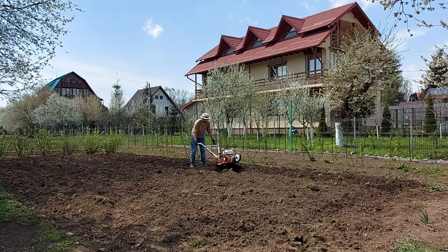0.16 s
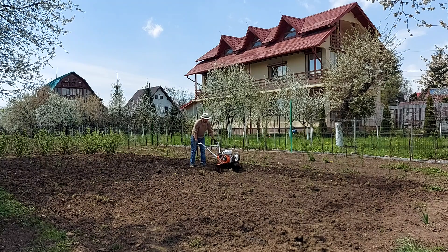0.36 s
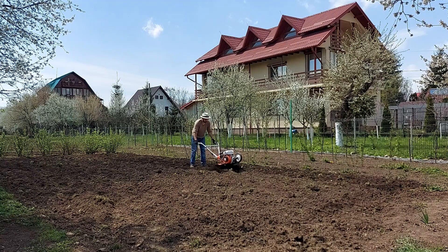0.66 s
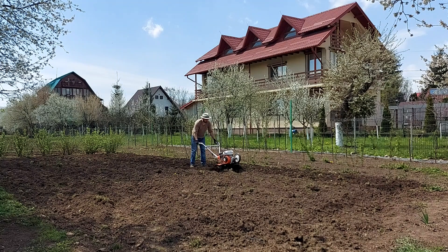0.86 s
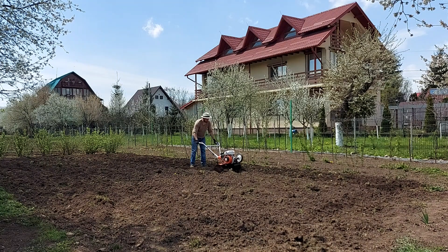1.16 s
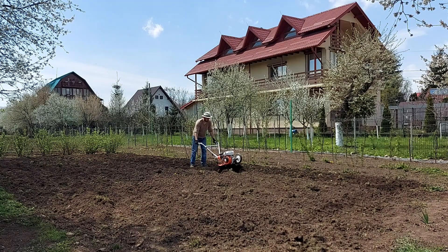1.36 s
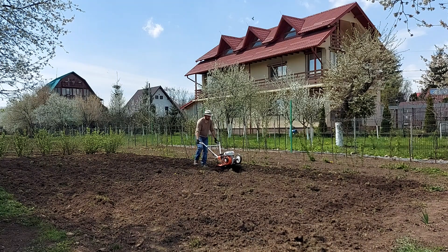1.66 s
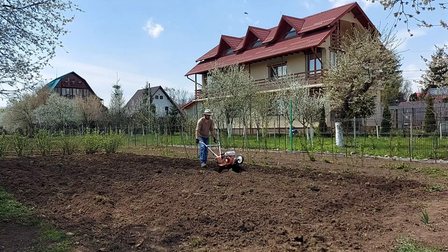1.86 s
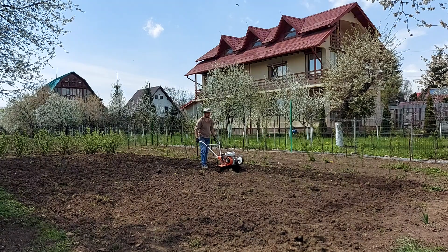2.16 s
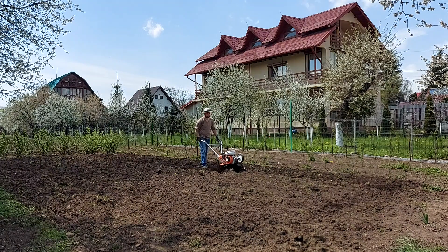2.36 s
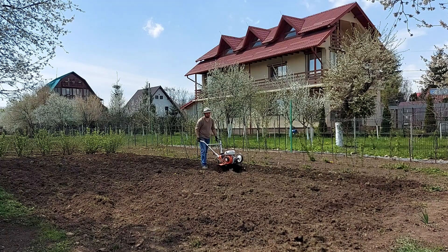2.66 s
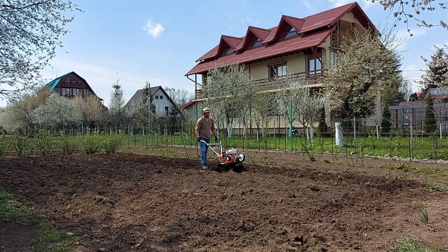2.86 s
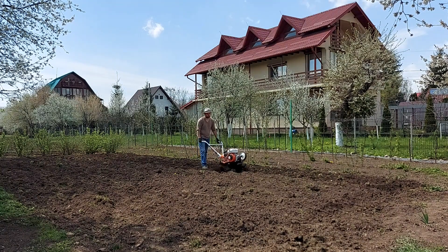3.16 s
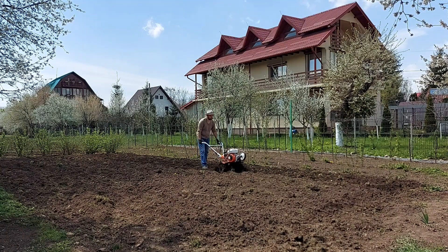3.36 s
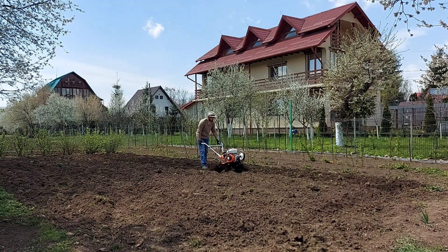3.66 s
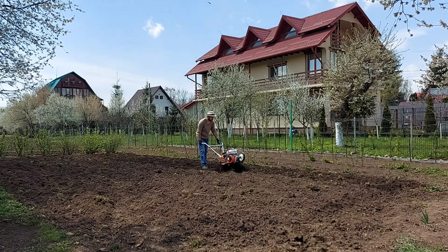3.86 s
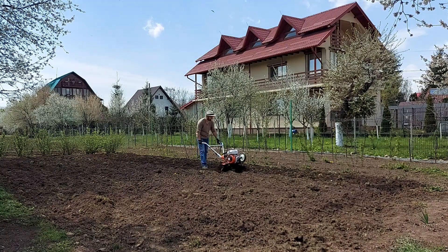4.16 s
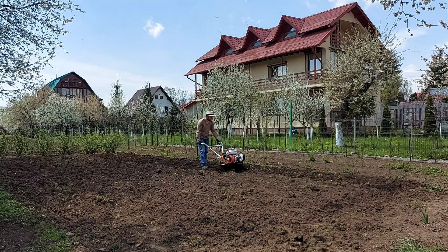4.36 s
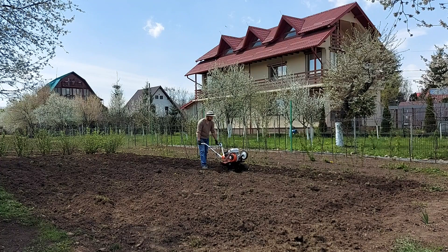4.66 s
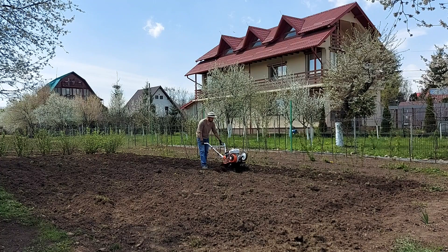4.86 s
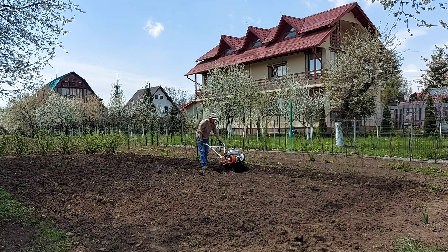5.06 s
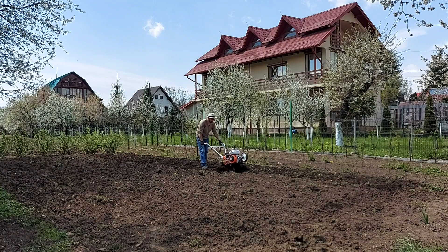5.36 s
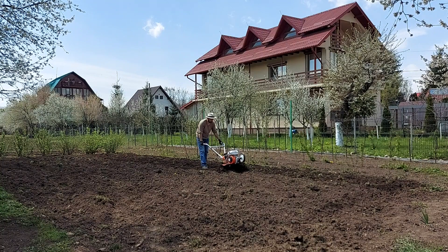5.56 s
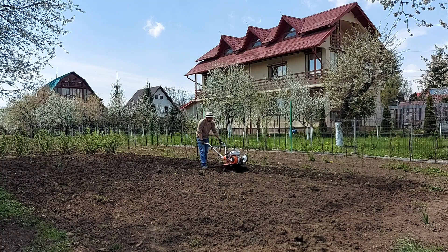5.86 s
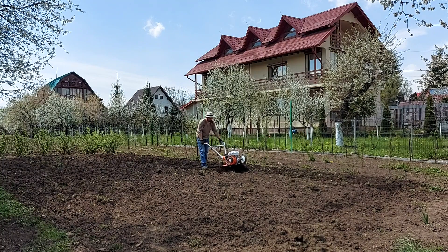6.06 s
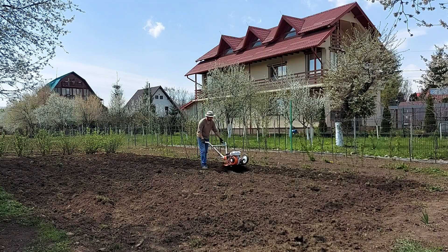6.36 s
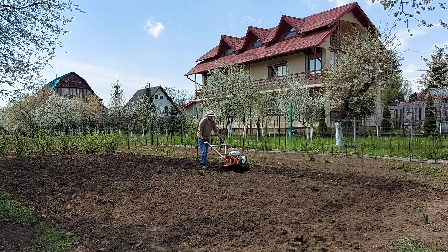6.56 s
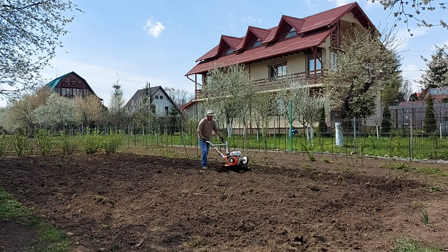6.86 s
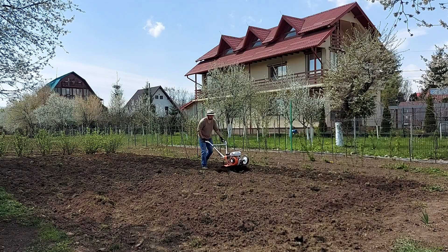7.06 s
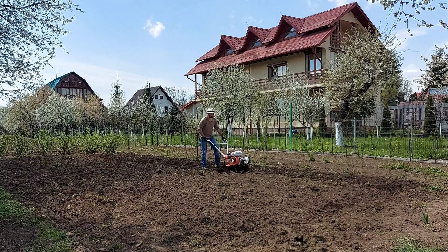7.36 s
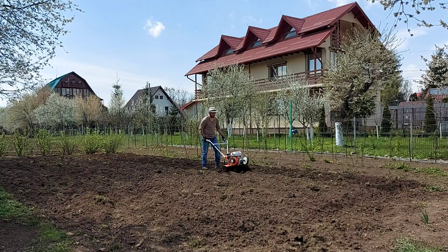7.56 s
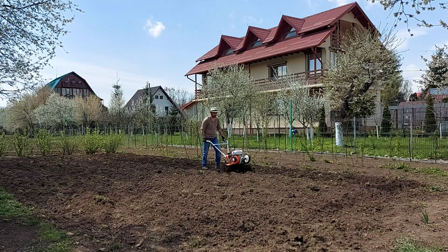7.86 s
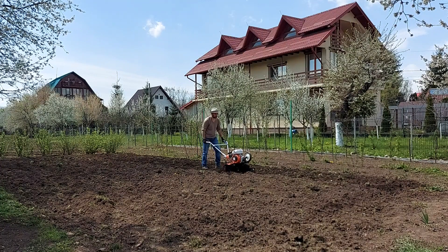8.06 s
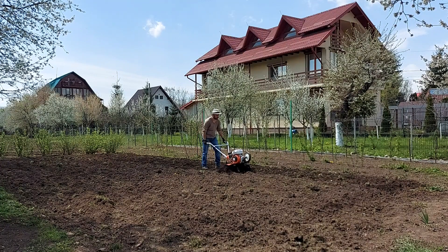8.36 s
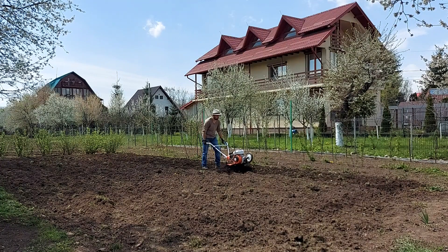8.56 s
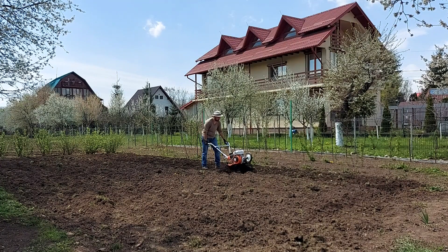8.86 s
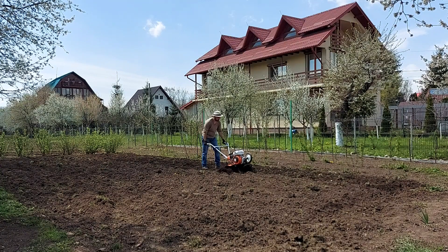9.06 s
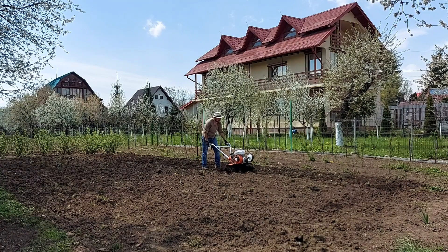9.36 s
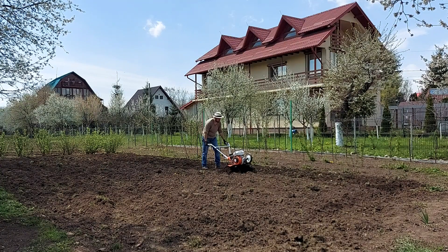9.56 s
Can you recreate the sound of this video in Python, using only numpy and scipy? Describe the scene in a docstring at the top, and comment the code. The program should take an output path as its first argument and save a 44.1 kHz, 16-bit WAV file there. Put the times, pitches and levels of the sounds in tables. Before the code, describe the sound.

Outdoors, a small single-cylinder tiller engine chugs under load, rattling metallically while dry earth rustles, the drive chirps and a light breeze rumbles.

```python
"""A petrol rotary tiller putters across a dry garden plot, some metres from the microphone.
Its single-cylinder four-stroke gulps, barks, knocks and clatters once a cycle, each stroke set off by one crank;
in bouts the governor hunts about three times a second. A nearby wall echoes the beat and the pipe drones.
Shaped noise makes the rustling, scraping soil and the light breeze on the microphone.
Short rising chirps make the squeaks of the drive."""
import sys
import numpy as np
from scipy import signal
from scipy.fft import rfft, irfft, next_fast_len
from scipy.io import wavfile
from scipy.ndimage import uniform_filter1d, map_coordinates

SR = 44100
rng = np.random.default_rng(int(sys.argv[2]) if len(sys.argv) > 2 else 0)


def unload_wav(signal):
    """Save mono or channel-first audio to the path in sys.argv[1] as 16-bit WAV at rate SR, clipped to [-1, 1]."""
    wavfile.write(
        sys.argv[1],
        SR,
        np.round(np.clip(np.atleast_2d(signal).T, -1, 1) * 32767).astype(np.int16),
    )


N = 428652


def amp(db):
    """Decibels to gain."""
    return 10 ** (np.asarray(db) / 20)


def unit(x):
    """x at rms 1."""
    return x / np.sqrt(np.mean(x ** 2) + 1e-20)


def seconds(count):
    """Time in s of each of count samples."""
    return np.arange(count) / SR


def curves(rows):
    """One value per sample for each column after the time."""
    s, *columns = np.transpose(rows)
    return [np.interp(seconds(N), s, column) for column in columns]


def wobble(rate):
    """A smooth random curve, rate knots a second."""
    knots = rng.standard_normal(int(N * rate / SR) + 4)
    return map_coordinates(knots, [np.arange(N) * rate / SR])


def bump(s, length):
    """A smooth swell of height 1 around time s."""
    return np.exp(-(2 * (seconds(N) - s) / length) ** 2)


def surge(t, rise):
    """A quick push that peaks at height 1 after rise seconds, then dies away."""
    return t / rise * np.exp(1 - t / rise)


def gain_along(points, hz):
    """Gain of (Hz, dB) points, read on a log frequency axis."""
    f, db = np.transpose(points)
    return amp(np.interp(np.log(hz + 1), np.log(f), db))


def filtered(x, response):
    """x with its spectrum multiplied by a response of frequency."""
    size = next_fast_len(N + SR // 2)
    return irfft(rfft(x, size) * response(np.fft.rfftfreq(size, 1 / SR)), size)[:N]


def coloured(x, spectrum):
    """x shaped by a spectrum, at rms 1."""
    return unit(filtered(x, lambda hz: gain_along(spectrum, hz)))


def add(track, s, sound):
    """Mix a short sound into the track at time s."""
    part = track[max(round(s * SR), 0):][:len(sound)]
    part += sound[:len(part)]


def strokes(cycle, place, scatter_db, jitter):
    """One impulse each time the engine passes a place in its cycle, uneven in size and time (jitter in s)."""
    chance = np.clip(rng.standard_normal((300, 2)), -2, 2)
    passes = np.arange(len(chance)) + place
    at = np.interp(passes, cycle, np.arange(N), right=2 * N) + jitter * SR * chance[:, 0]
    keep = (at >= 0) & (at < N)
    return np.bincount(at[keep].astype(int), amp(scatter_db * chance[keep, 1]), N)


def ring(blows, response):
    """Every impulse sets off the response."""
    return signal.fftconvolve(blows, response)[:N]


# the speed that the governor holds: start_s [s], speed [firings per second]
HELD_SPEED = [(0, 27.0), (.81, 26.63), (.94, 27.01), (1.27, 26.4), (1.75, 27.12), (1.93, 26.44),
              (3.05, 26.9), (3.45, 27.24), (4.53, 26.91), (4.75, 26.56), (5.16, 27.02), (6.6, 26.64),
              (8.35, 27.08), (9.72, 26.89)]
# bouts of hunting that swell and fade:
# top_surge_s [s], swing [firings per second], length_s [s], rate [surges per second]
HUNTING_BOUTS = [(2.82, .96, 1.22, 3.13), (4.83, 1.01, 1.03, 3.05), (5.72, .28, 1.37, 3.09),
                 (6.8, .37, 4.56, 3.52), (7.97, .59, 1.0, 2.89), (9.43, .43, .54, 2.62)]


def governor():
    """Firings per second: the held speed, overshot in both directions during each bout of hunting."""
    speed, = curves(HELD_SPEED)
    for s, swing, length, rate in HUNTING_BOUTS:
        speed = speed + swing * bump(s, length) * np.cos(2 * np.pi * rate * (seconds(N) - s))
    return speed


# air pushes of one cycle, in order: casing rocks, intake gulps, exhaust valve cracks open, exhaust blows
# place [cycle, 0-1], pitch_hz [Hz], rise_s [s], level_db [dB before direction and muffler],
# direction [scale; above 0 blows, below 0 sucks]
AIR_PUSHES = [(.057, 46, 0.0076, -28, 1), (0.1845, 125.7, 0.0017, -18, -0.62),
              (0.435, 546, 0.00085, -28.5, 0.72), (0.472, 176.5, 0.0026, -18, 0.83)]
# the muffler's colour: pitch_hz [Hz], gain_db [dB]
MUFFLER_COLOUR = [(27, -17), (50, 3), (80, 6.5), (110, 0.5), (135, 5.5), (160, 4.5), (190, 2.5),
                  (240, -1.5), (268, -3), (295, 1), (350, -0.5), (380, 5.5), (430, -3.5), (560, 4),
                  (650, 11), (800, -6.5)]


def beat(cycle, echo_s=0.01475, echo_db=-8.5):
    """Casing, intake and exhaust push the air in damped pulses, coloured by the muffler and echoed by a wall."""
    t, out = seconds(SR // 10), np.zeros(N)
    for place, hz, rise, db, direction in AIR_PUSHES:
        pulse = surge(t, rise) ** 2 * np.sin(2 * np.pi * hz * t)
        firings = strokes(cycle, place, scatter_db=.25, jitter=.00002)
        out += direction * amp(db) * ring(firings, pulse)

    def muffler_and_wall(hz):
        """Muffler gain, times the direct sound plus one delayed echo."""
        wall = 1 + amp(echo_db) * np.exp(-2j * np.pi * hz * echo_s)
        return gain_along(MUFFLER_COLOUR, hz) * wall

    return filtered(out, muffler_and_wall)


def drone(putter, speed, pipe_hz=268, width_hz=13, level_db=-35.5, tuned_speed=26.43, reach=0.88,
          lag_s=.05, pull_db=0.0749):
    """The pipe rings on near its resonance, swells as the engine pulls and fades when it races past."""
    late_speed = np.interp(np.arange(N) - lag_s * SR, np.arange(N), speed)
    racing = np.maximum(late_speed - tuned_speed, 0)  # firings per second above the tuned speed
    ringing = unit(filtered(putter, lambda hz: np.exp(-.5 * ((hz - pipe_hz) / width_hz) ** 2)))
    pull = np.gradient(speed) * SR  # firings per second gained each second
    return amp(level_db + pull_db * pull) / (1 + (racing / reach) ** 2) * ringing


# blows on the engine block: place [cycle, 0-1], level_db [dB before the modes and load]
BLOCK_BLOWS = [(0.96, -26.5), (.44, -28)]
# ringing modes of the block: pitch_hz [Hz], level_db [dB], t60_s [s]
BLOCK_MODES = [(980, -3, 0.075), (1045, -5.5, 0.07), (1201, -2.5, 0.041), (1353, -16, 0.044),
               (1560, -15, 0.044), (1798, -9, 0.1)]
# the frame jolts and a guard clanks: start_s [s], level_db [dB before clank_db, the modes and load]
GUARD_CLANKS = [(0.543, -13), (1.118, -19), (3.444, -16), (4.732, -15.5), (4.769, -18), (5.787, -17),
                (6.107, -15), (6.592, -14), (7.584, -21)]


def knock(cycle, clank_db=-5):
    """Combustion and piston slap ring the block, each mode uneven in strength; jolts clank the same metal."""
    t, out, jolts = seconds(SR // 10), np.zeros(N), np.zeros(N)
    for s, db in GUARD_CLANKS:
        add(jolts, s, np.array([amp(db + clank_db)]))
    for hz, mode_db, t60 in BLOCK_MODES:
        blows = jolts.copy()
        for place, db in BLOCK_BLOWS:
            blows += amp(db) * strokes(cycle, place, scatter_db=2.5, jitter=.00008)
        onset = 1 - np.exp(-t / 0.00064)
        out += ring(blows, amp(mode_db - 60 * t / t60) * np.sin(2 * np.pi * hz * t) * onset)
    return out


# relative spectrum of the valve gear: pitch_hz [Hz], level_db [dB per Hz]
CLATTER_SPECTRUM = [(1500, -13), (2900, -9.5), (3500, 0.5), (4000, 1), (4150, 3.5), (4350, 0), (4800, -2.5),
                    (6300, -3.5), (6900, -8), (7600, -15.5), (8800, -5.5), (9900, -7.5), (11100, -10.5),
                    (11900, -19.5), (13700, -17), (15800, -24)]
# valve gear and piston impacts: place [cycle, 0-1], level_db [dB over the steady hiss], t60_s [s]
VALVE_TAPS = [(.105, 4, 0.042), (0.238, 5, 0.074), (.41, -1, 0.026), (.85, -2, .02)]


def clatter(cycle):
    """Each impact of the valve gear is a short burst of bright noise on a steady hiss."""
    t, power = seconds(SR // 10), np.ones(N)
    for place, db, t60 in VALVE_TAPS:
        impacts = strokes(cycle, place, scatter_db=2.5, jitter=0.0001)
        power += ring(impacts ** 2, amp(db - 60 * t / t60) ** 2)
    bursts = rng.standard_normal(N) * np.sqrt(np.abs(power))
    return coloured(bursts * amp(0.97 * wobble(700)), CLATTER_SPECTRUM)


# relative spectrum of fan, gears and cowling: pitch_hz [Hz], level_db [dB per Hz]
CASING_SPECTRUM = [(80, -31), (140, -5.5), (280, -6.5), (430, -17), (620, -6.5), (800, -9), (960, -2.5),
                   (1250, -1.5), (1500, -2), (1850, -4.5), (2200, -7), (2550, -10), (3000, -21.5),
                   (5000, -38)]


def whirr(cycle, depth=0.13, loudest=0.27):
    """Fan, gears and cowling roar as noise, swelling once a cycle."""
    swell = 1 + depth * np.cos(2 * np.pi * (cycle - loudest))
    return coloured(rng.standard_normal(N) * swell * amp(0.78 * wobble(220)), CASING_SPECTRUM)


def rattle(cycle, low_hz=920, high_hz=2050, t60=0.053, loudest=.25, spread=.24, scatter_db=4):
    """Guards and linkages, shaken by the firings, chatter in short ringing strokes at random pitches."""
    t, out = seconds(SR // 25), np.zeros(N)
    chance = rng.standard_normal((2600, 2))
    turns = np.floor(rng.uniform(0, cycle[-1], len(chance))) + loudest + spread * chance[:, 0]
    starts = np.interp(turns, cycle, seconds(N))
    pitches = low_hz * (high_hz / low_hz) ** rng.random(len(chance))
    sizes = np.clip(chance[:, 1], -2, 2)
    fade = amp(-60 * t / t60) * (1 - np.exp(-t / 0.0003))
    for s, hz, size in zip(starts, pitches, sizes):
        add(out, s, amp(scatter_db * size) * fade * np.sin(2 * np.pi * hz * t))
    return unit(out)


# how hard the tines load the engine: start_s [s], load_db [dB]
TINE_LOAD = [(0, -0.1), (.7, 0.05), (1.08, 1.5), (1.45, 0.5), (1.85, -2), (2.5, 0), (3.15, 0.4),
             (3.9, -0.56), (4.8, .5), (5.45, -0.2), (5.9, .3), (6.25, 0.5), (6.48, -1.9), (6.7, 0),
             (7.9, 0.7), (8.2, 0), (9.72, 0.5)]


def tine_load():
    """Load of the ground on the tines in dB, around 0 at normal load."""
    load_db, = curves(TINE_LOAD)
    return load_db


# relative spectrum of dry soil: pitch_hz [Hz], level_db [dB per Hz]
SOIL_SPECTRUM = [(800, -31), (3000, -12), (5500, 12), (6600, 12), (7600, -2.5), (9000, 11.5), (11000, 6.5),
                 (12000, 0.5), (13800, 1.5), (15800, -12)]
# a tine grinds through a gritty clod: start_s [s], level_db [dB before the scrape and spray trims]
CLOD_SCRAPES = [(.1322, -27), (.8345, -36), (0.951, -30), (1.309, -27), (2.17, -31), (2.4798, -25),
                (2.6646, -25), (3.0719, -24), (3.1847, -25), (3.2585, -29.5), (3.3278, -32),
                (3.8117, -25.5), (4.52, -33), (4.6578, -31), (4.74, -30), (5.3344, -27), (5.63, -28.5),
                (6.1538, -26.5), (6.7, -32), (6.842, -29), (7.41, -28), (7.8645, -28), (7.905, -28),
                (7.9494, -27), (8.93, -34)]
SOIL_DB, SOIL_GROWS = -45.5, 2  # level in dB; dB per dB of load


def soil(cycle, load_db, depth=0.13, loudest=0.26, uneven_db=1.9, spray_s=0.025, spray_db=-14):
    """Dry crumbs rustle off the tines, harder once a cycle; gritty clods scrape louder and throw a spray."""
    t, scrapes, spray = seconds(SR // 4), np.zeros(N), np.zeros(N)
    for s, db in CLOD_SCRAPES:
        add(scrapes, s - .002, amp(db - 4.5) * surge(t, 0.0058))
        add(spray, s - spray_s, amp(db + spray_db) * surge(t, spray_s))
    rustle = np.hypot(amp(SOIL_DB + SOIL_GROWS * load_db + uneven_db * wobble(9)), spray)
    push = 1 + depth * np.cos(2 * np.pi * (cycle - loudest))
    crumbs = coloured(rng.standard_normal(N) * amp(3.6 * wobble(1100)), SOIL_SPECTRUM)
    return crumbs * np.hypot(push * rustle * amp(1.3 * wobble(70)), scrapes)


# the drive squeaks: start_s [s], level_db [dB before a 2.2 dB cut], pitch_hz [Hz at the chirp's swell]
DRIVE_SQUEAKS = [(0.0373, -22.5, 10000), (0.5947, -23, 8600), (0.6656, -24, 10000), (1.0331, -23, 9020),
                 (1.1209, -16.5, 8950), (1.387, -17, 9960), (1.921, -24, 9610), (1.9794, -26, 9370),
                 (2.2238, -19, 10500), (2.5466, -19, 8740), (2.5701, -14.5, 10100), (2.695, -16.5, 10000),
                 (2.8749, -19.5, 8900), (3.1898, -9, 9940), (3.7459, -13, 9020), (3.8601, -22, 9990),
                 (3.8871, -18.5, 9630), (4.3216, -23, 9640), (4.6578, -20.5, 10080), (4.7401, -25, 9990),
                 (5.3358, -20.5, 9100), (5.6974, -24, 10400), (5.7708, -26, 8350), (6.2334, -24, 10800),
                 (6.3325, -24, 9650), (6.783, -14.5, 9600), (6.8568, -14.5, 10500), (7.0988, -13.5, 10070),
                 (7.3434, -25, 10900), (7.419, -15, 9600), (7.6827, -15.5, 10870), (7.903, -23, 10900),
                 (8.6058, -27, 8400), (8.8628, -22.5, 9700), (9.0139, -23.5, 8620), (9.6435, -23.5, 10800)]


def squeaks(rise=0.003, waver_hz=270, sweep_hz_per_s=50000, tail_t60=0.24, tail_db=-12,
            faint_db=-31, count=30):
    """Dry metal slips in short, unsteady, rising chirps that scatter around the garden, faint ones between."""
    t, out = seconds(SR // 10), np.zeros(N)
    faint_starts = rng.uniform(0, N / SR, count)
    faint_levels = rng.normal(faint_db, 3, count)
    faint = np.transpose([faint_starts, faint_levels, rng.uniform(8400, 10740, count)])
    for s, db, hz in [*DRIVE_SQUEAKS, *faint]:
        waver = unit(uniform_filter1d(rng.standard_normal(len(t)), size=24))
        pitch = hz + sweep_hz_per_s * (t - rise) + waver_hz * waver
        chirp = surge(t, rise) ** 2 * np.sin(2 * np.pi * np.cumsum(pitch) / SR)
        tail = rng.standard_normal(len(t)) * amp(-60 * t / tail_t60)
        scattered = signal.fftconvolve(chirp, tail / np.linalg.norm(tail))[:len(t)]
        add(out, s - .001, amp(db - 2.2) * (chirp + amp(tail_db) * scattered))
    return out


def surroundings(x, t60=0.069, wet_db=-15):
    """Ground, fence and trees return a short cluster of faint reflections."""
    t = seconds(SR // 12)
    tail = rng.standard_normal(len(t)) * amp(-60 * t / t60) * (1 - np.exp(-t / .002))
    reflections = ring(x, tail / np.linalg.norm(tail))
    return (x + amp(wet_db) * reflections) / np.hypot(1, amp(wet_db))


# relative spectrum of air on the microphone: pitch_hz [Hz], level_db [dB per Hz]
BREEZE_SPECTRUM = [(15, -35), (30, -29), (45, 2.5), (65, 2), (100, -4.5), (160, -20), (400, -46)]
# gusts on the microphone: middle_s [s], level_db [dB], length_s [s]
BREEZE_GUSTS = [(.55, -43, .5), (1.408, -35, 0.076), (2.11, -32, 0.1), (3.084, -31, 0.37), (3.398, -43, .3),
                (3.936, -34, .07), (4.3, -37, .05), (4.65, -37, .28), (5.79, -38, 0.083), (5.947, -35, 0.1),
                (7.12, -37, .14), (7.502, -37, .16), (7.957, -36, .16), (8.37, -35, .24)]


def breeze(steady_db=-43.5, lumpy_db=2.5):
    """Low, lumpy noise of air rumbling on the microphone, swelling in short gusts."""
    steady = amp(steady_db + lumpy_db * wobble(11))
    gusts = sum(amp(db) * bump(s, length) for s, db, length in BREEZE_GUSTS)
    return np.hypot(steady, gusts) * coloured(rng.standard_normal(N), BREEZE_SPECTRUM)


THROTTLE_DB = 0.0261  # louder per (firing per second) gained each second
CASING_DB, RATTLE_DB = -30, -36.5  # at normal load
# level in dB; dB per dB of load and throttle; dB per s, fading as the machine moves along
CLATTER_DB, CLATTER_GROWS, CLATTER_DB_PER_S = -35, 1.08, -0.1659


def scene(surge_db=0.93, unsteady_db=.5):
    """The crank drives the engine; speed fattens the beat, load and throttle harden block, casing and valves."""
    speed = governor()
    cycle = np.cumsum(speed) / SR
    load_db = tine_load()
    effort_db = load_db + THROTTLE_DB * np.gradient(speed) * SR
    body_db = effort_db + unsteady_db * wobble(14)
    clatter_db = CLATTER_DB + CLATTER_GROWS * effort_db + CLATTER_DB_PER_S * seconds(N) + .7 * wobble(16)
    putter = beat(cycle)
    exhaust = amp(surge_db * (speed - np.mean(speed))) * putter + drone(putter, speed)
    block = amp(body_db) * knock(cycle)
    casing = amp(body_db + CASING_DB) * whirr(cycle) + amp(body_db + RATTLE_DB) * rattle(cycle)
    valves = amp(clatter_db) * clatter(cycle)
    reflected = surroundings(casing + valves + soil(cycle, load_db))
    return (exhaust + block + reflected + squeaks() + breeze())[None]


def record(dry, top_hz=15850):
    """The microphone's signal keeps nothing at or above its band limit."""
    return filtered(dry[0], lambda hz: hz < top_hz)[None]


dry = scene()
out = record(dry)
unload_wav(out)
```